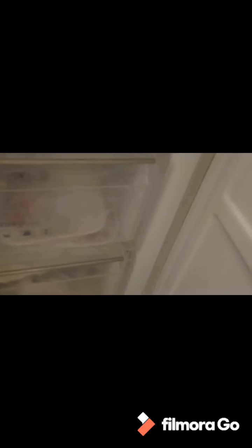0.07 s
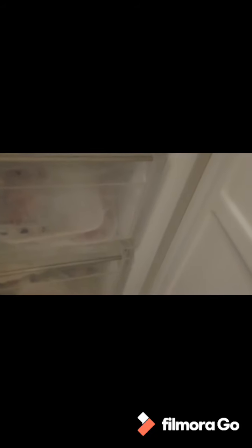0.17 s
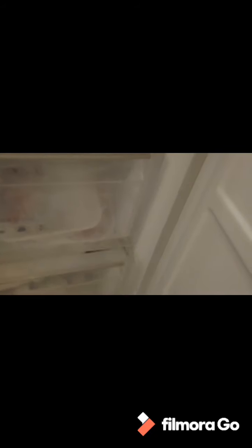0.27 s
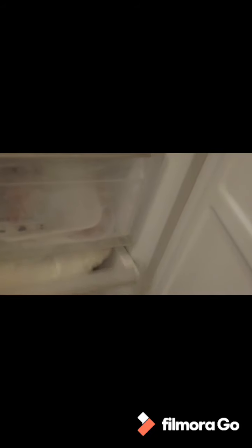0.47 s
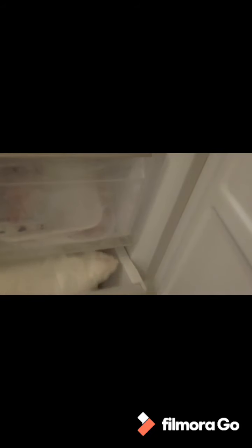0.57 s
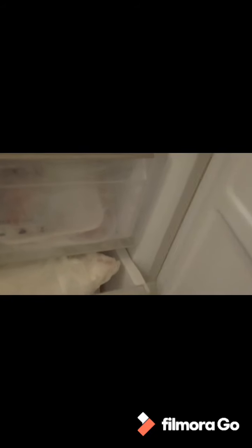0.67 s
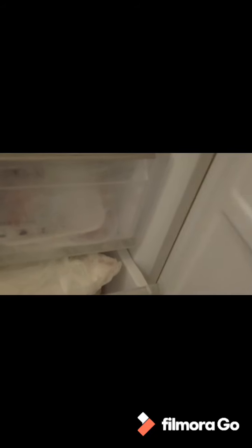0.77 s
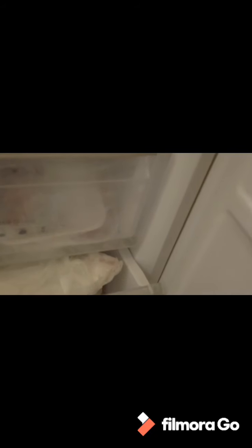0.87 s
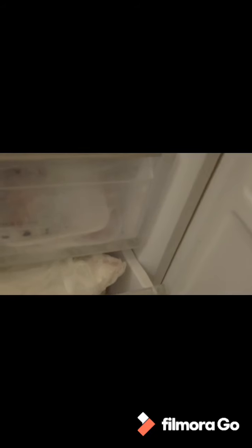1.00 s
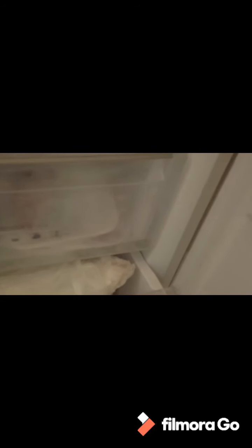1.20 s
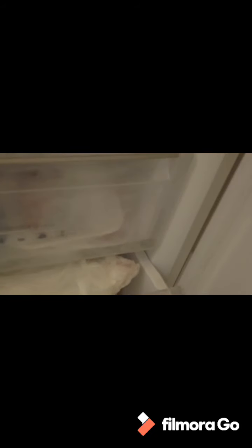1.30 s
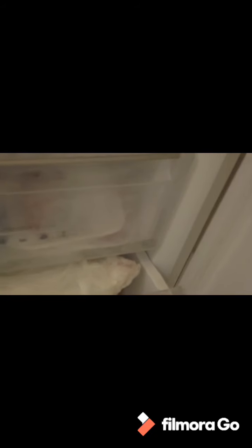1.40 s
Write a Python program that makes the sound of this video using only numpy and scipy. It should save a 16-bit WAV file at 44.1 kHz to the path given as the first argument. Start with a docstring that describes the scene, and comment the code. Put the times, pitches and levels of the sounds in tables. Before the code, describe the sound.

A plastic fridge drawer clatters open, scrapes along and thumps to a stop.

```python
"""A plastic fridge drawer is pulled open in a small kitchen. Plastic rubs briefly, then the drawer
breaks free with a clattering knock. It scrapes and bumps along its runners with a faint ringing,
and thumps into its stop, which sets the room booming. After a pause come two light taps and a
last short rub. The kitchen adds a short echo and a quiet background throughout."""
import sys
import numpy as np
from scipy import signal
from scipy.fft import rfft, irfft, next_fast_len
from scipy.io import wavfile

SR = 44100
rng = np.random.default_rng(int(sys.argv[2]) if len(sys.argv) > 2 else 0)


def bounce(signal):
    """Save signal as a 16-bit WAV file at the path given by the first command-line argument."""
    frames = np.transpose(np.atleast_2d(signal))
    limited = np.clip(frames, -1, 1)
    pcm = np.round(limited * 32767).astype(np.int16)
    wavfile.write(sys.argv[1], SR, pcm)


N = 63945
ATTACK_S = 0.0013

# narrow ringing pitches, probably the room's, that colour knocks and scrapes (pitch [Hz], level [dB])
RING_NOTES = [(1005, -2), (1216, -7), (1475, -7), (1620, -10.5), (1815, -8), (1954, -4), (2123, -4),
              (2191, -6), (2472, -7), (2693, -8.5), (2887, -12.5)]
# the high hiss of sliding and knocking plastic (frequency [Hz], level [dB])
HISS_COLOUR = [(3500, -14), (5500, -13), (6500, -2.5), (7500, -1.5), (8500, 1.5), (9600, -4.5), (11500, 3),
               (13000, -2), (15500, -6)]


def amp(db):
    """Turn decibels into a number to multiply by."""
    return 10 ** (np.asarray(db) / 20)


def unit(x):
    """Scale a signal to an average power of 1."""
    return x / np.sqrt(np.mean(x ** 2) + 1e-20)


def along(points, hz):
    """Read between a table's (frequency, value) rows, with octaves evenly spaced."""
    freqs, values = np.transpose(points)
    return np.interp(np.log(hz + 1), np.log(freqs + 1), values)


def filtered(x, gain):
    """Turn each frequency of x up or down by gain(hz)."""
    size = next_fast_len(N + SR // 2)
    return irfft(rfft(x, size) * gain(np.fft.rfftfreq(size, 1 / SR)), size)[..., :N]


def spread(pair, likeness):
    """Mix two unrelated signals into a left and a right that are partly alike."""
    angle = lambda hz: np.arccos(np.clip(along(likeness, hz), -1, 1)) / 2
    mid, side = filtered(pair, lambda hz: np.array([np.cos(angle(hz)), np.sin(angle(hz))]))
    return np.array([mid + side, mid - side])


def coloured(pair, gain):
    """Give two signals a colour (a balance of low and high) and make them stereo."""
    # how alike left and right are (frequency [Hz], likeness [0 to 1])
    likeness = [(25, 0.91), (100, .999), (300, .99), (700, .93), (2500, 0.49), (4500, .3), (8000, .15),
                (14000, 0.043)]
    return unit(spread(filtered(pair, gain), likeness))


def noise(colour):
    """Steady stereo noise of the given colour."""
    return coloured(rng.standard_normal((2, N)), lambda hz: amp(along(colour, hz)))


def focus(hz, centre, lift_db, octaves=0.58):
    """A broad lift around one frequency, or a dip if lift_db is negative."""
    return amp(lift_db * np.exp(-.5 * (np.log2((hz + 1) / centre) / octaves) ** 2))


def fade(t, rise_s, fade_s):
    """Rise quickly and die away, losing 60 dB every fade_s seconds."""
    return (1 - np.exp(-t / rise_s)) * 1000 ** (-t / fade_s)


def slips(per_second=1800, spread_db=3, grit=0.41):
    """Plastic sticks and slips: tiny uneven clicks over smooth noise."""
    clicks = (rng.random(N) < per_second / SR) * amp(spread_db * rng.standard_normal(N))
    clicks = unit(clicks * rng.standard_normal((2, N)))
    return np.sqrt(grit) * clicks + np.sqrt(1 - grit) * rng.standard_normal((2, N))


def ringing(hz, width_hz=21, lift_db=6.5):
    """Sound near the ringing pitches comes out stronger."""
    return 1 + sum(amp(lift_db + db) / (1 + (2 * (hz - note) / width_hz) ** 2)
                   for note, db in RING_NOTES)


def friction(colour):
    """Slips of the given colour, lifted at the ringing pitches."""
    return coloured(slips(), lambda hz: amp(along(colour, hz)) * ringing(hz))


def rubs(lift_db=16, top_hz=4300, sheen_db=-16):
    """Rubs swell and fade, making the plastic ring over a rumble and a thin hiss."""
    # each rub (start [s], peak [s], end [s], level [dB], rumble [dB], focus [Hz], rise [dB], fall [dB])
    strokes = [(0, 0.014, .03, -37.5, -50, 3560, 3, 10.5), (0.011, 0.042, 0.6, -69, -56, 2530, -7.5, 3),
               (1.388, 1.404, 1.435, -47.5, -55, 1120, 7.5, 1.5),
               (1.414, 1.449, 1.47, -41.5, -59, 2070, 9.5, 4.5)]
    # where rubbed plastic rings (pitch [Hz], width [Hz], level [dB])
    notes = [(700, 480, -7.5), (1020, 140, 0), (1213, 37, 3), (1610, 39, 2.5), (2170, 120, -1),
             (2273, 55, -0.5), (2790, 240, -4.5), (3060, 160, -6.5), (3700, 160, -3.5)]
    # a rub's low rumble (frequency [Hz], level [dB])
    rumble_colour = [(60, -7.5), (140, -2.5), (185, -6), (280, -13), (600, -27), (1500, -55)]
    # a rub's thin hiss (frequency [Hz], level [dB])
    sheen_colour = [(4000, -31), (6000, -12.5), (7400, 5), (9500, 2), (11500, -8.5), (15000, -17.5)]

    def body(hz):
        return sum((-1) ** k * amp(db) * 1j * hz * width / (note ** 2 - hz ** 2 + 1j * hz * width)
                   for k, (note, width, db) in enumerate(notes))

    t, out = np.arange(N) / SR, np.zeros((2, N))
    for start, peak, end, db, rumble_db, centre, rise_db, fall_db in strokes:
        swell = amp(np.interp(t, [start, peak, end], [-rise_db, 0, -fall_db], left=-120, right=-120))
        gain = lambda hz: body(hz) * focus(hz, centre, lift_db) / (1 + (hz / top_hz) ** 10)
        rasp = coloured(slips(), gain)
        sheen = amp(sheen_db) * friction(sheen_colour)
        out += swell * (amp(db) * (rasp + sheen) + amp(rumble_db) * friction(rumble_colour))
    return out


def slide():
    """The drawer rumbles, scrapes and hisses along its runners."""
    # how loud the sliding is (time [s], rumble [dB], scrape [dB], hiss [dB])
    loudness = [(0, -57, -47, -49), (.03, -42, -51, -56), (.06, -58, -73, -69.5), (.215, -84, -63.5, -71),
                (.235, -60, -40.5, -47.5), (.275, -36, -34, -57), (.31, -31.5, -49, -65.5),
                (.365, -46, -49, -63), (.39, -46, -47, -58), (.45, -40, -49.5, -64.5), (.53, -36, -45, -61),
                (.57, -38.5, -46, -56), (.605, -38.5, -41, -48.5), (.66, -39.5, -39.5, -55),
                (.68, -64, -47, -56), (0.701, -58, -45.5, -49), (.76, -41, -40.5, -53),
                (.82, -66, -71, -72.5), (.92, -80, -82, -92)]
    # the runners' low rumble (frequency [Hz], level [dB])
    rumble_colour = [(50, -20.5), (75, -5), (100, -2), (150, 3.5), (210, -7), (320, -5.5), (430, -17.5),
                     (650, -24.5), (1200, -43)]
    # the runners' scrape (frequency [Hz], level [dB])
    scrape_colour = [(240, -24.5), (400, -1), (480, -17), (700, -12.5), (1010, -11), (1600, -12),
                     (2200, -9.5), (2900, -9), (3900, -21.5), (6000, -31.5), (7800, -66)]
    times, *levels = np.transpose(loudness)
    return sum(amp(np.interp(np.arange(N) / SR, times, db, left=-120, right=-120)) * friction(colour)
               for db, colour in zip(levels, (rumble_colour, scrape_colour, HISS_COLOUR)))


def knocks(ring_db=-19, boom_hz=75.2, thud_rise_s=0.0035):
    """Each knock clacks, rings, thuds in the drawer's tub and feeds the room's slowly swelling boom."""
    # each knock (time [s], clack [dB], hiss [dB], thud [dB], boom [dB],
    #             focus [Hz], lift [dB], clack fade [s])
    hits = [(0.075, -39, -63.5, -52.5, -78, 2830, 19, 0.019),
            (0.1261, -44, -86, -50, -43.5, 2300, 17, 0.03),
            (0.2362, -20.5, -34.5, -26.5, -19.5, 2350, 16.5, 0.065),
            (.248, -12.5, -34, -31.5, -51, 2040, 10.5, 0.055),
            (0.2629, -20.5, -31.5, -30, -49, 1080, -3.5, 0.069),
            (.308, -33, -56.5, -36, -25.5, 2200, 3.5, 0.061), (0.38, -40, -44, -50, -72, 2700, 21, .08),
            (0.4616, -27.5, -57.5, -24, -23, 1870, 0.5, 0.056),
            (0.5469, -25.5, -66.5, -26.5, -40, 1065, 25.5, 0.027),
            (.582, -28.5, -51.5, -50, -67, 2500, -18, 0.097),
            (.607, -25.5, -47.5, -41, -46, 1080, -7, 0.036), (.642, -33.5, -52.5, -62, -61, 2200, 1, .05),
            (.692, -20.5, -40.5, -9, -15.5, 1540, 5.5, 0.13),
            (0.736, -30, -48, -31.5, -24.5, 1520, 4, 0.076),
            (.857, -40, -54.5, -66.5, -64, 2500, 1.5, 0.075), (1.014, -64.5, -80, -62, -68, 2604, 13, .06)]
    # the clack of plastic (frequency [Hz], level [dB])
    clack_colour = [(150, -7), (260, -2), (520, -2.5), (640, -12), (850, -8), (1250, -9.5), (1750, -13.5),
                    (2200, -10.5), (3100, -14.5), (3900, -25.5), (4500, -24.5), (5500, -58), (7800, -67.5)]
    # the hollow tub's low notes (pitch [Hz], level [dB], fade [s])
    tub_notes = [(126.9, -9.5, 0.129), (142.2, 0.5, 0.22), (165.6, -6.5, .09), (231, -8.5, 0.18),
                 (246.1, -5.5, .14), (305, -19.5, 0.27), (413, -18, 0.2), (514, -28.5, 0.16)]
    out, boom = np.zeros((2, N)), np.zeros(N)
    clock = np.arange(N) / SR
    for start, clack_db, hiss_db, thud_db, boom_db, centre, lift_db, clack_fade_s in hits:
        t = np.maximum(clock - start, 0)
        gain = lambda hz: amp(along(clack_colour, hz)) * focus(hz, centre, lift_db)
        clack = coloured(rng.standard_normal((2, N)), gain)
        out += amp(clack_db) * fade(t, ATTACK_S, clack_fade_s) * clack
        out += amp(hiss_db) * fade(t, ATTACK_S, fade_s=0.086) * noise(HISS_COLOUR)
        ring = sum(amp(db + rng.normal(0, 1.1)) * np.sin(2 * np.pi * (hz * t + rng.random()))
                   for hz, db in RING_NOTES)
        out += amp(clack_db + ring_db) * fade(t, ATTACK_S, fade_s=0.13) * ring
        soft_start = 1 - np.exp(-t / thud_rise_s)
        for hz, db, fade_s in tub_notes:
            thud = soft_start * fade(t, ATTACK_S, fade_s) * np.sin(2 * np.pi * hz * t)
            out += amp(thud_db + db + rng.normal(0, 1)) * thud
        boom += amp(boom_db) * fade(t, rise_s=0.02, fade_s=0.37)
    return out + boom * np.sin(2 * np.pi * boom_hz * clock)


def taps():
    """Two light touches make hollow plastic ring for a moment."""
    # each tap (time [s], level [dB])
    touches = [(1.362, -49.5), (1.376, -42.5)]
    # the notes of the tapped plastic (pitch [Hz], level [dB], fade [s])
    notes = [(537, -3, 0.047), (635, 2, 0.032), (1440, -9.5, 0.022), (1780, 0.5, 0.013), (2255, -8, 0.036),
             (3250, -13.5, 0.035)]
    out = np.zeros(N)
    for start, tap_db in touches:
        t = np.maximum(np.arange(N) / SR - start, 0)
        for hz, db, fade_s in notes:
            tone = np.sin(2 * np.pi * (hz * t + rng.random()))
            out += amp(tap_db + db) * fade(t, ATTACK_S, fade_s) * tone
    return out


def kitchen(sound, low_cut_hz=340, rise_s=0.007):
    """The kitchen's hard walls answer with a short, bright echo."""
    # how long the echo lasts (frequency [Hz], fade [s])
    fade_times = [(100, 0.35), (250, 0.19), (500, 0.33), (2000, 0.31), (6000, .43), (14000, 0.5)]
    # how alike the echo is left and right (frequency [Hz], likeness [-1 to 1])
    likeness = [(100, 0.65), (300, 0.99), (700, 0.79), (1400, .45), (2800, .45), (4500, -0.35),
                (9000, -0.62)]
    # split noise into frequency bands and let each die away at its own speed
    hz, t, bands = signal.stft(rng.standard_normal((2, N)), SR, nperseg=256)
    bands *= fade(t, rise_s, along(fade_times, hz)[:, None])
    tail = signal.istft(bands, SR, nperseg=256)[1][:, :N]
    tail = spread(tail / np.linalg.norm(tail[0]), likeness)
    tail = signal.sosfilt(signal.butter(3, low_cut_hz, 'high', fs=SR, output='sos'), tail)
    return signal.fftconvolve(sound.mean(axis=0, keepdims=True), tail, axes=1)[:, :N]


def scene(echo_db=-6, background_db=-58.5):
    """The drawer close by, the kitchen's echo and its quiet background."""
    # the kitchen's steady, low background noise (frequency [Hz], level [dB])
    background_colour = [(15, -4), (40, 0), (65, -11), (100, -13.5), (150, -10), (210, -22), (340, -17),
                         (450, -33.5), (830, -33.5), (1700, -35.5), (3200, -35), (5000, -48),
                         (11700, -44.5), (15500, -62.5)]
    drawer = knocks() + slide() + rubs() + taps()
    return drawer + amp(echo_db) * kitchen(drawer) + amp(background_db) * noise(background_colour)


def record(dry):
    """Cut away the very highest treble."""
    return filtered(dry, lambda hz: hz < 15900)


dry = scene()
out = record(dry)
bounce(out)
```